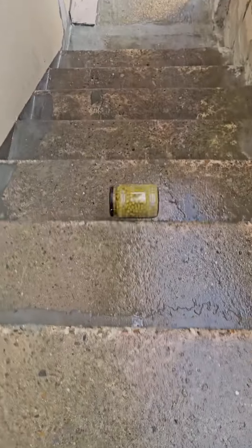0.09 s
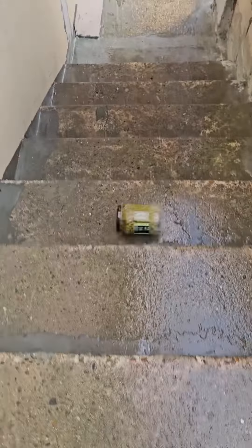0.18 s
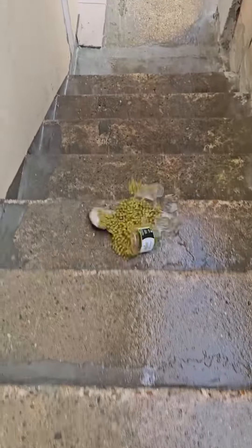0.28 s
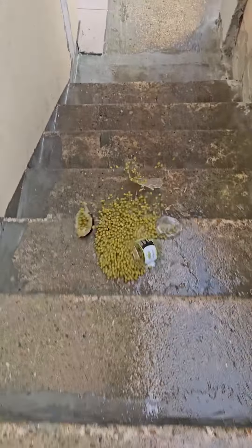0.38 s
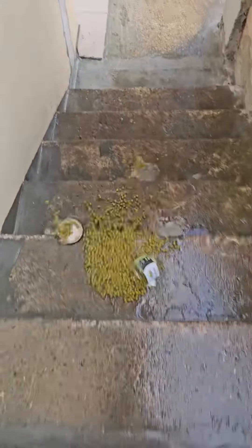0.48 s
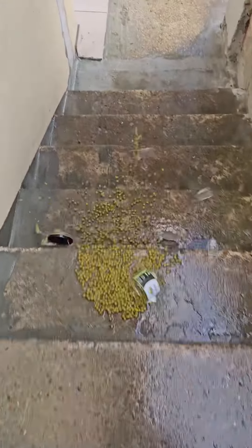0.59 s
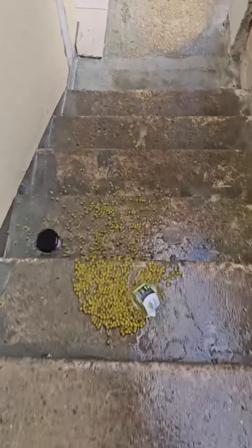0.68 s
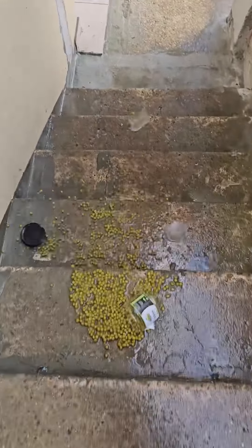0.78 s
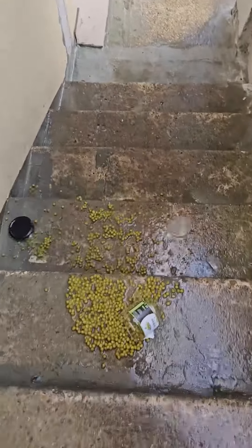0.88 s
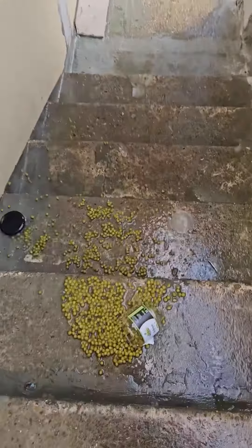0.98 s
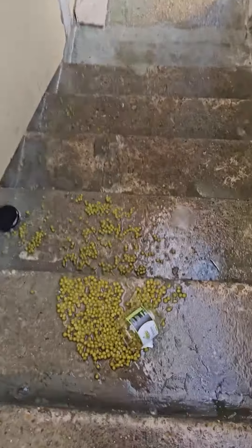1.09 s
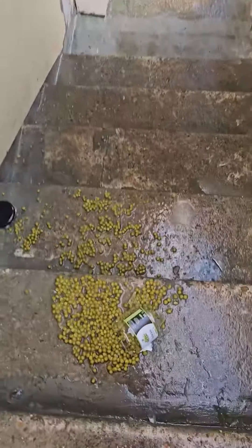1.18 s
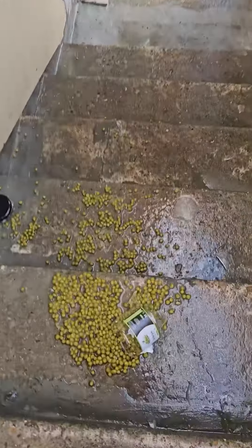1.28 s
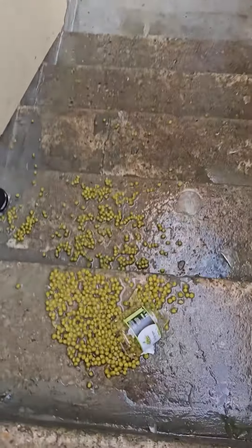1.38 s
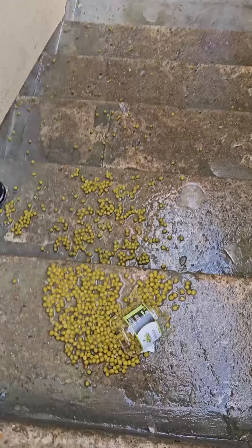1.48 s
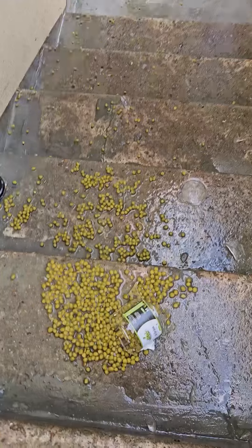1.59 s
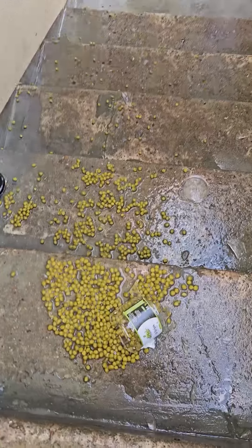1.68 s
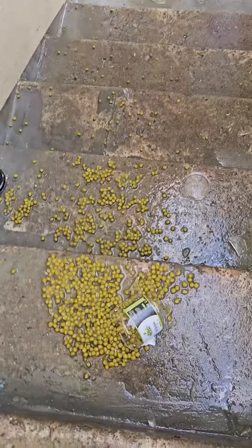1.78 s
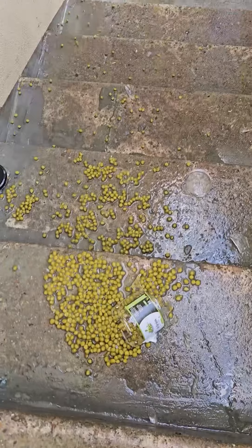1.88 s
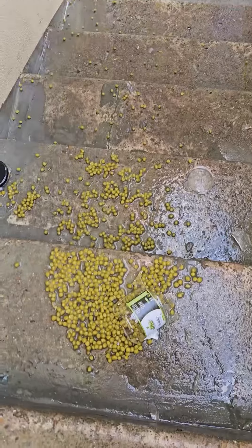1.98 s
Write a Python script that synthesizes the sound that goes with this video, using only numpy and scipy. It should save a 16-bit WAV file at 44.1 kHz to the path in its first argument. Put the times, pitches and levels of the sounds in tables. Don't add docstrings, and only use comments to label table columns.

```python
import sys
import numpy as np
from scipy import signal
from scipy.fft import rfft, irfft, next_fast_len
from scipy.io import wavfile

SR = 44100
rng = np.random.default_rng(int(sys.argv[2]) if len(sys.argv) > 2 else 0)


def generate_wav(signal):
    frames = np.transpose(np.atleast_2d(signal))
    scaled = np.clip(frames, -1, 1) * 32767
    pcm = np.round(scaled).astype(np.int16)
    wavfile.write(sys.argv[1], SR, pcm)


def field_ratio(decibels):
    return 10 ** (np.asarray(decibels, dtype=float) / 20)


N = 90405


def rms_one(x):
    return x / np.sqrt(np.mean(x ** 2) + 1e-20)


def in_time(rows):
    time_s, *columns = np.transpose(rows)
    return [np.interp(np.arange(N) / SR, time_s, column) for column in columns]


def colour(x, points):
    hz, level_db = np.transpose(points)
    n = next_fast_len(N + 4096)
    bin_hz = np.arange(n // 2 + 1) * SR / n
    gain = field_ratio(np.interp(np.log(bin_hz + 1), np.log(hz), level_db))
    return irfft(rfft(x, n) * gain, n)[..., :N]


def ring(x, hz, t60_s):
    r = field_ratio(-60 / (t60_s * SR))
    w = 2 * np.pi * hz / SR
    return signal.lfilter([0, np.sin(w)], [1, -2 * r * np.cos(w), r * r], x + 1e-18)


def clicks(time_s, level_db):
    out = np.zeros(N)
    index = np.minimum((np.asarray(time_s) * SR).astype(int), N - 1)
    np.add.at(out, index, field_ratio(level_db))
    return out


def fade(x, t60_s):
    return signal.lfilter([1], [1, -field_ratio(-60 / (t60_s * SR))], x + 1e-18)


def place(x, pan_db, lag_samples):
    t = np.arange(N)
    x = x * np.ones((2, 1))
    left = np.interp(t - lag_samples / 2, t, x[0]) * field_ratio(pan_db / 2)
    right = np.interp(t + lag_samples / 2, t, x[1]) * field_ratio(-pan_db / 2)
    return np.array([left, right])


def grains(per_s, spread_db):
    size = field_ratio(spread_db * np.minimum(rng.exponential(1, N), 4)) * rng.choice([-1, 1], N)
    return rms_one(size * (rng.random(N) < per_s / SR))


def crack(time_s, level_db, tail_s, glass):
    # (frequency [Hz], level [dB])
    crack_colour = [(400, -41.5), (1200, -13.5), (2400, 3), (3350, 1.5), (6500, 3), (10000, -2),
                    (16000, -2.5)]
    c = clicks(time_s, level_db)
    noise = rms_one(colour(np.roll(glass, rng.integers(N), axis=1), crack_colour))
    return noise * (0.22 * fade(c, 0.022) + 0.26 * fade(c, tail_s) - 0.33 * fade(c, 0.005))


def strike(c, hz, t60_s, contact_s):
    tumble_per_s, tumble_db = 140, 5
    knots = rng.standard_normal((3, 600))
    t = np.arange(N) * tumble_per_s / SR
    sway = [np.interp(t, np.arange(600), .7 * knots[0] + .7 * own) for own in knots[1:]]
    swell = ring(c, hz, t60_s) - 0.79 * ring(c, hz, contact_s)
    return swell * field_ratio(tumble_db * np.array(sway))


def burst(glass):
    # (time [s], peak [dB])
    bursts = [
        (0.229, 3.5),
    ]
    # (frequency [Hz], level [dB], t60 [s])
    body_modes = [(72.6, -7, 0.045), (119.4, -5.5, 0.076), (194.8, -5, 0.13), (277.7, -4, 0.1),
                  (343.3, -10, 0.2), (452, -10.5, 0.087), (1260, -0.5, 0.014), (2150, -3.5, 0.011)]
    thud_db, crack_db, tail_s = -13.5, -5.5, 0.074
    time_s, peak_db = np.transpose(bursts)
    out = crack(time_s, peak_db + crack_db, tail_s, glass)
    for k, (hz, level_db, t60_s) in enumerate(body_modes):
        out = out + ring(clicks(time_s, peak_db + thud_db + level_db), hz, t60_s) * (-1) ** k
    return out


def piece(modes, hits, glass):
    contact_s, crack_tail_s, spread_db = 0.013, 0.091, 2.5
    time_s, peak_db, crack_db = np.transpose(hits)
    uneven_db = rng.normal(0, spread_db, (len(time_s), len(modes)))
    out = crack(time_s, peak_db + crack_db, crack_tail_s, glass)
    for k, (hz, level_db, t60_s) in enumerate(modes):
        c = clicks(time_s, peak_db + level_db + uneven_db[:, k])
        out = out + strike(c, hz, t60_s, contact_s)
    return out


def large_pieces(glass):
    # (frequency [Hz], level [dB], t60 [s])
    modes_a = [(2590, 12, 0.017), (4595, -12.5, 0.86), (5225, 8, 0.11), (8030, -1.5, 0.06),
               (8230, -6, 0.056), (11590, 0, 0.065), (12750, -10.5, 0.07), (15100, -21.5, .08)]
    modes_b = [(2242, -14.5, 0.12), (2732, -8.5, .15), (3868, -11, 0.13), (4530, -12.5, .1),
               (5160, -17.5, 0.095), (5900, -12, 0.077), (6200, -10.5, 0.081), (7950, -0.5, 0.065),
               (8350, -8, 0.044), (9420, -14.5, 0.11), (10380, -15.5, 0.11), (11600, -18, 0.15),
               (13100, -13, .08), (14700, -13.5, .06)]
    modes_c = [(3760, -10, 0.21), (5240, -27, 0.32), (5965, -15, 0.15), (6500, -19.5, 0.11),
               (7200, -13, 0.098), (7920, -5.5, 0.11), (8130, -12, 0.091), (10400, -14, 0.12),
               (11420, -9, 0.16), (12690, -15.5, 0.08), (13900, -12, 0.071), (15310, -6, 0.054)]
    modes_d = [(2340, -17.5, 0.12), (3750, -8.5, 0.074), (3920, -13.5, .05), (5940, -14, .12),
               (6300, -21, .08), (7355, 1, 0.093), (7380, -0.5, 0.064), (7780, -9.5, .05),
               (8866, -16, 0.048), (9860, -21.5, .08), (11300, -5.5, .05), (11800, -11, 0.078),
               (12700, -24.5, 0.072), (15540, -5.5, .06)]
    # (time [s], peak [dB], crack re peak [dB])
    hits_a = [
        (0.6351, -31.5, 0),
        (0.777, -24.5, 13),
        (.783, -15, 5.5),
        (.790, -17, -5),
    ]
    hits_b = [
        (0.69, -28, 16.5),
        (0.8756, -20.5, 6),
        (0.8865, -19.5, 4),
        (0.898, -9, -5),
        (0.925, -32, 21),
    ]
    hits_c = [
        (1.0152, -7, 0.5),
        (1.141, -32.5, 8),
        (1.181, -25.5, 3),
        (2.04, -49, -16),
    ]
    hits_d = [(0.4743, -29, 17), (0.481, -22, 13), (0.517, -36.5, 15.5), (1.342, -16, 2.5), (1.359, -28, 1),
              (1.423, -48, -16), (1.446, -33.5, -16), (1.556, -48.5, 8.5), (1.595, -57, 13),
              (1.649, -52, -11), (1.689, -45.5, -16), (1.7133, -47, -11)]
    # (left-right [dB], left lag [samples])
    places = [
        (3.5, -6),
        (4.5, -5.5),
        (8.5, -5),
        (9, -5.5),
    ]
    all_modes = (modes_a, modes_b, modes_c, modes_d)
    all_hits = (hits_a, hits_b, hits_c, hits_d)
    return sum(place(piece(modes, hits, glass), pan_db, lag_samples)
               for modes, hits, (pan_db, lag_samples) in zip(all_modes, all_hits, places))


def shards(glass):
    # (time [s], frequency [Hz], level [dB], t60 [s])
    shard_hits = [(.109, 2800, -43, 0.0089), (.295, 2112, -9, 0.022), (.298, 6150, -26, 0.079),
                  (.362, 11100, -25.5, 0.14), (.43, 5116, -32.5, 0.16), (.484, 6000, -11, 0.032),
                  (.542, 11400, -21.5, .12), (.548, 4900, -43, 0.28), (.676, 7900, -21.5, 0.046),
                  (.688, 6195, -26, 0.15), (.692, 9150, -24.5, .1), (0.51, 11390, -32.5, 0.085),
                  (.69, 4580, -30.5, 0.19), (.72, 2890, -14.5, 0.021), (.738, 7820, -22, 0.066),
                  (1.1, 13000, -40.5, .1), (.905, 1142, -35, 0.14), (.905, 2722, -30.5, 0.14),
                  (.94, 11400, -29, 0.097), (1.115, 4570, -30, .1), (1.3, 8150, -29, .04),
                  (1, 6300, -36, 0.068), (1.181, 2340, -28, 0.069), (1.187, 7100, -31, 0.034),
                  (1.19, 12750, -37, 0.051), (1.208, 11370, -32.5, 0.34), (1.21, 4585, -29.5, 0.24),
                  (1.228, 2356, -25.5, 0.039), (1.232, 15100, -39, 0.053), (1.424, 5900, -36.5, 0.081),
                  (1.445, 11120, -29.5, 0.076), (1.464, 5900, -37.5, 0.13), (2.1, 11200, -44, .06),
                  (1.57, 3400, -49.5, 0.12), (1.6, 3760, -42, 0.084), (1.901, 6900, -51, 0.1),
                  (1.919, 3740, -47.5, .13)]
    crack_db = -6.5
    all_s, _, all_db, _ = np.transpose(shard_hits)
    out = crack(all_s, all_db + crack_db, 0.04, glass)
    for time_s, hz, level_db, t60_s in shard_hits:
        out = out + strike(clicks([time_s], level_db + 6.5), hz, t60_s, 0.36 * t60_s)
    return out


def ticks(glass):
    # (time [s], peak [dB], t60 [s], centre [Hz])
    tick_hits = [(.012, -26, 0.015, 9000), (.306, -18, .02, 14000), (.347, -28, .02, 9000),
                 (.360, -18, 0.033, 12500), (.484, -10, 0.02, 7000), (.516, -19, .02, 9000),
                 (0.675, -23, 0.022, 9000), (.688, -22.5, 0.055, 11000), (.72, -13.5, 0.044, 1975),
                 (.784, -8, 0.017, 6000), (0.882, -8, 0.027, 6500), (1.011, -25, .02, 7000),
                 (1.017, -7, 0.027, 9000), (1.033, -16, 0.026, 6000), (1.259, -36, .02, 8000),
                 (1.336, -23.5, .02, 7500), (1.446, -40, 0.019, 14000), (1.597, -41.5, 0.034, 13500),
                 (1.891, -46, 0.021, 2000)]
    length = 4000
    out = np.zeros((2, N))
    for time_s, peak_db, t60_s, hz in tick_hits:
        i = int(time_s * SR)
        band = signal.butter(1, [hz * .65, min(hz * 1.4, 18000)], "band", fs=SR, output="sos")
        noise = rms_one(signal.sosfilt(band, glass[:, N - i - length:N - i]))
        out[:, i:i + length] += noise * field_ratio(peak_db - 8 - 60 * np.arange(length) / SR / t60_s)
    return out


def knocks():
    # (time [s], frequency [Hz], level [dB], t60 [s])
    knock_hits = [(.638, 397, -33, 0.028), (.688, 521, -28, 0.031), (0.72, 465, -21.5, 0.042),
                  (0.721, 1000, -22.5, 0.016), (.735, 1158, -29, 0.11), (.87, 437, -33.5, 0.049),
                  (1.379, 580, -23.5, 0.061)]
    out = np.zeros(N)
    for time_s, hz, level_db, t60_s in knock_hits:
        out += ring(clicks([time_s], level_db + 6), hz, t60_s)
        out -= ring(clicks([time_s], level_db + 7.5), hz, 0.42 * t60_s)
    return out


def skid():
    # (time [s], level [dB])
    skid_path = [
        (.3, -55),
        (.33, -34.5),
        (.375, -37.5),
        (.385, -35),
        (.47, -36),
        (.52, -41.5),
        (.56, -79),
    ]
    modes_hz = (1050, 1146, 1172, 1340)
    before, after = (skid_path[0][0] - .03, -90), (skid_path[-1][0] + .04, -90)
    level_db, = in_time([before] + skid_path + [after])
    grit = rng.standard_normal(N)
    body = sum(ring(grit, hz, 0.095) * weight for hz, weight in zip(modes_hz, (0.29, 1.0, 1.0, 0.53)))
    return field_ratio(level_db) * rms_one(body)


def lid():
    # (time [s], level [dB], pitch [Hz])
    roll = [
        (0.969, -40, 2595),
        (1.001, -43, 2542),
        (1.13, -37, 2497),
        (1.229, -41, 2308),
        (1.267, -35.5, 1900),
        (1.311, -40.5, 1549),
        (1.342, -44.5, 1400),
        (1.36, -74, 1286),
    ]
    ticks_per_s, width_hz = 250, 270
    before, after = (roll[0][0] - .03, -90, 2600), (roll[-1][0] + .03, -90, 1200)
    level_db, hz = in_time([before] + roll + [after])
    r = np.exp(-np.pi * width_hz / SR)
    rim = grains(ticks_per_s, 7.0) + 0.72 * rng.standard_normal(N)
    throb = signal.lfilter([1], [1, -2 * r, r * r], rim)
    return field_ratio(level_db) * rms_one(throb * np.sin(2 * np.pi * np.cumsum(hz) / SR))


def splinters():
    dead_hz = (3350, 9500, 12150, 13700)
    dead_db, patchy_db, grains_per_s, t60_s, bands = -7.5, 4.5, 2400, 0.018, 56
    out = (rng.standard_normal((2, N)) + rng.standard_normal(N)) * 0.12
    for hz in np.linspace(300, 15900, bands) + rng.uniform(-120, 120, bands):
        side_db = rng.uniform(-2.4, 3.26)
        patch = np.interp(np.arange(N) / SR * 25, np.arange(60), rng.standard_normal(60))
        dead = np.exp(-((hz - np.array(dead_hz)) / 350) ** 2).sum()
        grit = rng.standard_normal((2, N)) * 0.5 + rng.standard_normal(N) * 0.48
        grit = grit + 0.64 * grains(grains_per_s / bands, 4.12)
        tone = 0.13 * rms_one(ring(grit, hz, t60_s))
        out = out + tone * field_ratio(patchy_db * patch + dead_db * dead) * field_ratio([[side_db], [-side_db]])
    return rms_one(out)


def scatter(glass):
    # (time [s], level [dB])
    scatter_path = [(.010, -43), (.013, -33), (.08, -62.5), (.228, -52), (.235, -20), (.33, -32.5),
                    (.46, -40), (.62, -56), (.7, -29.5), (.77, -42), (.9, -38.5), (1.0, -49.5), (1.2, -45),
                    (1.32, -49.5), (1.4, -43), (1.52, -66.5), (2.05, -67)]
    # (frequency [Hz], level [dB])
    scatter_colour = [(300, -1), (700, -3), (2200, -3), (3350, -4), (5500, -5.5), (10000, -10.5),
                      (16000, -12)]
    level_db, = in_time(scatter_path)
    return field_ratio(level_db) * rms_one(colour(glass, scatter_colour))


def stairwell(x):
    t60_s, echo_db, wall_cut_hz = 0.25, -5.5, 7600
    t = np.arange(int(.5 * SR)) / SR
    noise = rng.standard_normal((2, len(t))) * (t > .004)
    low = signal.sosfilt(signal.butter(1, wall_cut_hz, fs=SR, output="sos"), noise)
    echo = low * field_ratio(-60 * t / t60_s) + (noise - low) * field_ratio(-60 * t / t60_s / 0.5)
    echo = echo / np.sqrt(np.sum(echo ** 2, axis=1, keepdims=True))
    return field_ratio(echo_db) * signal.fftconvolve(x[None], echo, axes=1)[:, :N]


def air():
    # (frequency [Hz], level [dB])
    air_colour = [(22, -20), (45, 5), (100, -21), (300, -18.5), (900, -33), (4000, -42), (9000, -42.5),
                  (16000, -73)]
    # (time [s], level [dB])
    wind_path = [(0, -31), (.2, -47), (.3, -37.5), (.7, -48.5), (.84, -35), (1.0, -54), (1.43, -40.5),
                 (1.7, -52), (2.05, -48.5)]
    air_db = -46.5
    mid, side = colour(rng.standard_normal((2, N)), air_colour)
    side = signal.lfilter([1, -1], [1, -.95], side)
    hum = rms_one(mid + 0.87 * side * [[1], [-1]])
    wind_db, = in_time(wind_path)
    band = signal.butter(2, [35, 100], "band", fs=SR, output="sos")
    wind = signal.sosfilt(band, rng.standard_normal((2, N)))
    wind = rms_one(wind[0] + 0.12 * wind[1] * [[1], [-1]])
    return field_ratio(air_db - 3) * hum + field_ratio(wind_db - 4.0) * wind


def scene():
    glass = splinters()
    near = large_pieces(glass)
    near = near + place(burst(glass), 2.2, -3)
    near = near + place(shards(glass), 6.7, -6.0)
    near = near + place(ticks(glass), 4.0, -4.5)
    near = near + place(skid(), 0.39, -2.0)
    near = near + place(lid(), 0.31, -5.0)
    to_walls = signal.lfilter([1, -1], [1, -.9], near.mean(axis=0))
    return near + stairwell(to_walls) + place(knocks(), 1.3, -7.5) + scatter(glass) + air()


def top_cut(x):
    return signal.sosfilt(signal.butter(12, 17170, fs=SR, output="sos"), x)


def record(dry):
    cutoff_hz = 15900
    rounded = 1.2 * np.tanh(dry / 1.2)
    lowpass = signal.cheby2(8, 22, cutoff_hz + 350, fs=SR, output="sos")
    mix = signal.sosfilt(lowpass, rounded)
    return top_cut(mix)


dry = scene()
out = record(dry)
generate_wav(out)
```